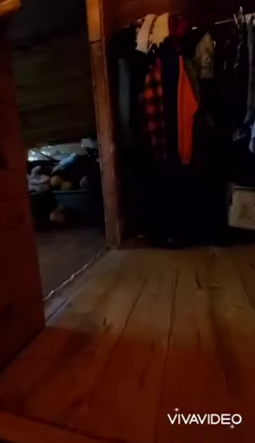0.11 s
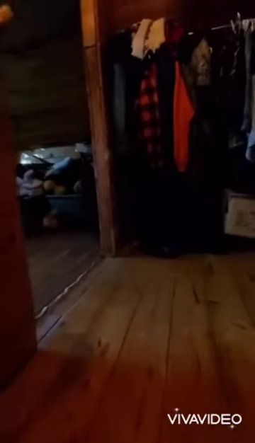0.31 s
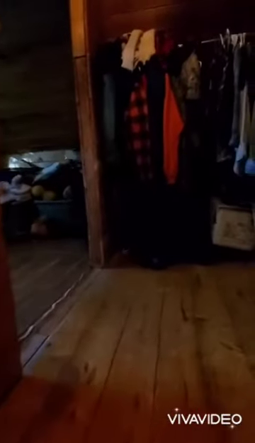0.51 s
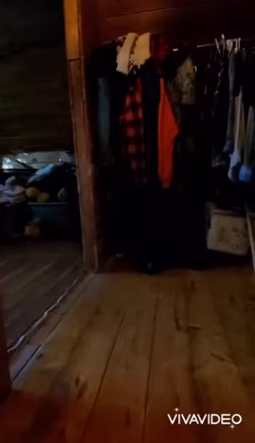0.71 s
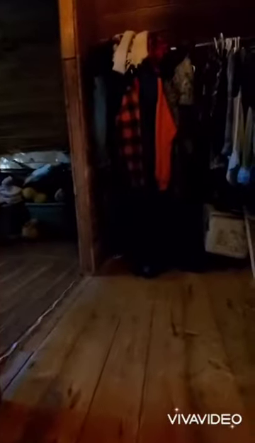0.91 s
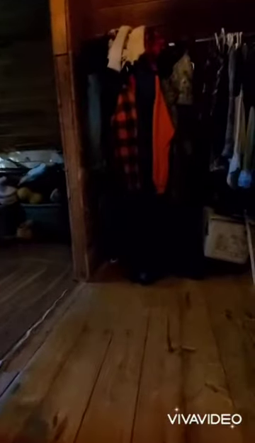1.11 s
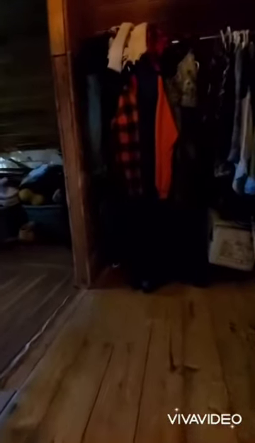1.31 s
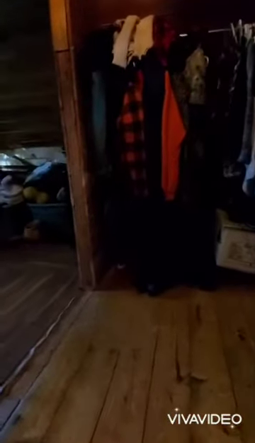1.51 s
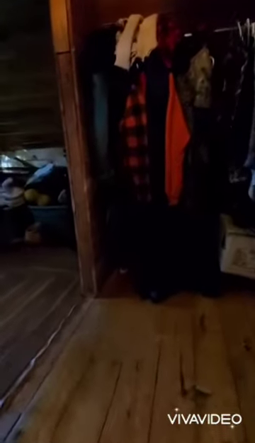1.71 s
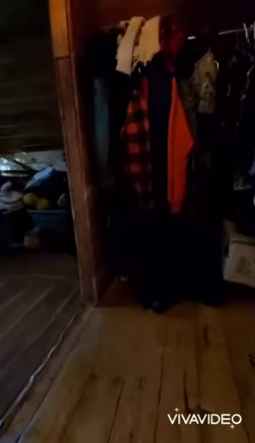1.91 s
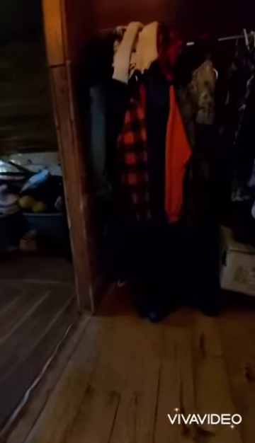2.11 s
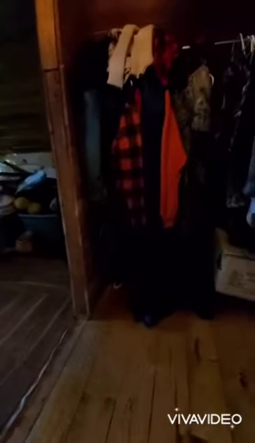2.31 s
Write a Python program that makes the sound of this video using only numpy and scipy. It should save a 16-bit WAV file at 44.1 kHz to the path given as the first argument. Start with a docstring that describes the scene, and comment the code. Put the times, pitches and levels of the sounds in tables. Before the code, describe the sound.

Footsteps on wooden planks: a knock at 0.2 s with a lighter one at 0.3, a scraping scuff into a knock at 0.5, then firm thuds at 0.7 and 0.9. A soft step at 1.1 leads into a longer scuff, ending in a knock at 1.4. Two quick knocks come near 1.8-1.9, a small bright clack at 2.1, then near quiet. Short dry room, faint wavering hum and hiss.

```python
"""Shoes on wooden stairs and planks in a small timber house, heard by a phone with two microphone ports.
Each footfall is a short rattle of contacts, each scuff a dense drag of them; both ring the boards and a
short, dry room. Single planks add notes of their own, as decaying sine tones. Underneath lie a low wavering
hum made from a sine, and a faint room hiss and thin whines made from narrow bands of noise."""
import sys
import numpy as np
from scipy import signal
from scipy.fft import rfft, irfft
from scipy.io import wavfile
from scipy.ndimage import uniform_filter1d

SR = 44100
rng = np.random.default_rng(int(sys.argv[2]) if len(sys.argv) > 2 else 0)


def dump(signal):
    """Clip the signal to [-1, 1] and save it as 16-bit WAV at the path in sys.argv[1]."""
    limited = np.clip(np.atleast_2d(signal).T, -1, 1)
    pcm = np.round(limited * 32767).astype(np.int16)
    wavfile.write(sys.argv[1], SR, pcm)


def level_to_linear(level):
    """Convert decibel levels to linear amplitude factors, elementwise."""
    exponent = np.asarray(level, float) / 20
    return 10 ** exponent


N = 110250


def along(table, hz, column=1):
    """Reads a table at any frequency, on a log-frequency axis."""
    table = np.array(table, float)
    return np.interp(np.log(hz), np.log(table[:, 0]), table[:, column])


def unit(x):
    """Scales a sound to rms 1."""
    return x / np.sqrt(np.mean(x ** 2))


def band_noise(hz, width_hz, size):
    """Noise in a bell-shaped band, rms 1."""
    f = np.fft.rfftfreq(size, 1 / SR)
    bell = np.exp(-((f - hz) / width_hz) ** 2)
    return unit(irfft(rfft(rng.standard_normal(size)) * bell, size))


def walk(rate):
    """Random levels, a new one every 1 / rate seconds, smoothed twice into a slow wander."""
    k = int(SR / rate)
    held = np.repeat(rng.standard_normal(N // k + 1), k)
    return 1.52 * uniform_filter1d(uniform_filter1d(held, k), k)[:N]


def add(out, sound, s):
    """Mixes a sound in at s seconds."""
    i = int(s * SR)
    out[:, i:i + sound.shape[1]] += sound[:, :N - i]


# How wide the sound is: side over mid [f/Hz, level/dB]
STEREO_WIDTH = [(60, -44), (125, -19.5), (250, -8.5), (500, 1), (900, 6.5), (1500, 6.5), (2500, -1),
                (5000, 1), (12000, 1.5)]
# How the two ports differ: left minus right [f/Hz, level/dB]
LEFT_OVER_RIGHT = [(60, -10.5), (110, 3), (200, -4), (380, 4), (700, 0), (1290, -0.5), (2380, 3),
                   (4400, 6.5), (8120, 6.5), (15000, 7)]


def ports(mid, side, hz):
    """Left and right from the mid and side of one band, each port with its own strength at that pitch."""
    spread = level_to_linear(along(STEREO_WIDTH, hz)) * side * np.array([[1], [-1]])
    balance = level_to_linear(along(LEFT_OVER_RIGHT, hz) * np.array([[.5], [-.5]]))
    return (mid + spread) * balance


# Tone of the room floor, before its overall level is set [f/Hz, level/dB per Hz]
HISS_TONE = [(18, -32), (30, -10), (81, -3.5), (194, -9), (616, -17.5), (988, -25), (1190, -22.5),
             (1720, -25), (2060, -28), (3140, -26.5), (3490, -33.5), (6380, -35.5), (8080, -56),
             (9460, -47), (16000, -41)]
HISS_DB, HISS_FLICKER_DB = -51, 1.


def hiss():
    """Room floor: noise in narrow bands that flicker slightly, each on its own."""
    out = 0
    for hz in 32 * 2 ** np.arange(0, 9.1, 1 / 6):
        mid, side = (band_noise(hz, hz / 13, N) for _ in range(2))
        level = level_to_linear(along(HISS_TONE, hz) + HISS_FLICKER_DB * walk(2.5))
        out = out + ports(mid, side, hz) * level * np.sqrt(hz)  # wider bands hold more power
    return unit(out) * level_to_linear(HISS_DB)


# Faint narrow bands in the floor, before they swell and spread over the ports [f/Hz, level/dB]
WHINE_BANDS = [(1190, -73.5), (2120, -75.5), (3150, -74)]
WHINE_WIDTH_HZ, WHINE_SWELL_DB = 60, 1.5


def whines():
    """Faint narrow bands of noise that swell and sink, perhaps a distant appliance."""
    out = 0
    for hz, db in WHINE_BANDS:
        mid, side = (band_noise(hz, WHINE_WIDTH_HZ, N) for _ in range(2))
        out = out + level_to_linear(db + WHINE_SWELL_DB * walk(4.08)) * ports(mid, side, hz)
    return out


# Course of the hum level, before its flutter [t/s, level/dB]
HUM_LEVEL = [(0.0, -36.5), (0.02, -49.5), (0.31, -49), (0.34, -58), (0.37, -44.5), (1.19, -53.5),
             (1.31, -44), (1.51, -63), (1.67, -45), (1.73, -68), (1.78, -73), (1.87, -52), (1.94, -61),
             (2.04, -53), (2.38, -53.5), (2.42, -63), (2.46, -52), (2.5, -59)]
HUM_HZ, HUM_WAVER_HZ, HUM_FLUTTER_DB = 60.1, 3.71, 1


def hum():
    """A low sine that wavers in pitch and level, alike at both ports."""
    s, db = np.array(HUM_LEVEL).T
    phase = 2 * np.pi * np.cumsum(HUM_HZ + HUM_WAVER_HZ * walk(12)) / SR
    level = np.interp(np.arange(N) / SR, s, db) + HUM_FLUTTER_DB * walk(24.64)
    return np.sqrt(2) * np.sin(phase) * level_to_linear(level)


# Centres of the four registers: knock, thump, clack, grit [f/Hz]
REGISTER_CENTRES = [600, 150, 2200, 5000]


def shares(hz):
    """How much of a frequency belongs to each register; neighbours fade into each other."""
    order = np.argsort(REGISTER_CENTRES)
    centres = np.log(np.sort(REGISTER_CENTRES))
    return [np.interp(np.log(hz), centres, order == k) for k in range(4)]


# Tone of struck wood, relative [f/Hz, level/dB per Hz]
WOOD_TONE = [(24, -37), (40, -17), (151, 3.5), (256, -5.5), (491, -0.5), (896, -8), (1300, -7), (1900, -9),
             (2840, -9.5), (3300, -19), (5310, -22), (8130, -36.5), (9690, -32), (14500, -48.5),
             (16000, -39.5)]
# Notes of the boards, relative; the t60 is capped below [f/Hz, level/dB, t60/s]
BOARD_MODES = [(135, -12, 0.72), (205.66, -11, 2.3), (361.4, -7.5, 0.18), (484, -2, 0.087),
               (660, -11, 0.27), (990, -18, 0.42), (1149, -10.5, 0.061), (1235, -28, 0.31)]
BOARDS_DB, BOARDS_T60_MAX_S = -12, 0.22  # level against the diffuse part
# Dying away and building up in the room [f/Hz, t60/s, build-up/s]
ROOM_DECAY = [(60, 0.33, 0.0092), (160, 0.3, 0.0044), (390, 0.16, 0.0047), (1060, .19, 0.0011),
              (2860, .17, 0.0005), (7660, 0.16, 0.00033)]


def responses(size=2 ** 14):
    """What one contact sets ringing, per register: diffuse wood and room, plus the board modes."""
    t, diffuse, modes = np.arange(size) / SR, 0, 0
    for hz in 32 * 2 ** np.arange(0, 9.1, 1 / 3):
        t60 = along(ROOM_DECAY, hz)
        rise = abs(along(ROOM_DECAY, hz, column=2)) + 1e-4
        shape = unit((1 - np.exp(-t / rise)) * 1000. ** (-t / t60))
        mid, side = (band_noise(hz, hz / 7, size) * shape for _ in range(2))
        tail = ports(mid, side, hz) * level_to_linear(along(WOOD_TONE, hz)) * np.sqrt(hz)
        diffuse = diffuse + np.multiply.outer(shares(hz), tail)
    for hz, db, t60 in BOARD_MODES:
        a, b = rng.uniform(0, 2 * np.pi, 2)
        shape = (1 - np.exp(-t / 0.016)) * 1000. ** (-t / min(t60, BOARDS_T60_MAX_S))
        tone = ports(np.sin(2 * np.pi * hz * t + a), np.sin(2 * np.pi * hz * t + b), hz) * shape
        modes = modes + level_to_linear(db) * np.multiply.outer(shares(hz), tone)
    both = diffuse / diffuse[:2].std() + level_to_linear(BOARDS_DB) * modes / modes[:2].std()
    energy = (both.mean(axis=1) ** 2).sum(axis=1)
    return both / np.sqrt(energy)[:, None, None]


def ring(force):
    """Contacts ring their own spot of the floor: registers x channels x samples."""
    return signal.fftconvolve(force[:, None, :], responses(), axes=2)


CONTACT_SCATTER_DB = 3.5  # how unequal the contacts are


def clicks(per_s, size):
    """Sparse contacts of either sign and scattered size; the first one lands at once."""
    hit, big, sign = rng.random((3, size))
    hit[0] = 0
    strength = level_to_linear(-CONTACT_SCATTER_DB * np.log(big + 0.016))
    return (hit < per_s / SR) * strength * np.sign(sign - .5)


# Soles dragging over the wood, one list per scuff, before the register gains
# [t/s, knock level/dB, thump level/dB, clack level/dB, grit level/dB]
SCUFF_PATHS = [
    [(0.34, -35, -50, -52, -67), (0.356, -34.5, -66, -48, -61), (0.384, -29, -49, -33.5, -50),
     (0.4, -33, -42, -44, -55.5), (0.44, -27.5, -34, -35.5, -50.5), (0.452, -27, -35, -44, -47),
     (0.46, -33, -32, -39, -46), (0.488, -58, -26, -52, -65), (0.495, -34, -22, -28, -47)],
    [(1.13, -41.5, -45, -47, -62), (1.154, -35.5, -43, -58, -56), (1.184, -43, -48, -48, -69),
     (1.19, -49, -50, -52, -63)],
    [(1.19, -38, -58, -52, -59), (1.204, -31, -43, -36.5, -45.5), (1.252, -29.5, -33.5, -35, -40),
     (1.302, -27, -34, -34.5, -40.5), (1.334, -29, -30.5, -33, -44.5), (1.372, -27.5, -39, -36, -44),
     (1.395, -57, -54, -75, -57)],
    [(2.065, -67, -47, -79, -82), (2.075, -42, -48, -69, -72), (2.089, -42, -42, -50, -61),
     (2.097, -35.5, -55, -31, -41), (2.109, -42, -43, -31, -47), (2.121, -45.5, -48, -51, -44),
     (2.16, -51, -42.5, -45, -70)],
]
# Added to knock, thump, clack, grit [level/dB]
SCUFF_GAINS = [-1, -1, -1, -1]
DRAG_PER_S, DRAG_PATCHY_DB = 1500, 1.2


def scuffs():
    """Dragged soles: stick-slip contacts whose pressure comes in patches."""
    out = np.zeros((2, N))
    for rows in map(np.array, SCUFF_PATHS):
        grit = clicks(DRAG_PER_S, SR // 2) * level_to_linear(DRAG_PATCHY_DB * walk(60.8)[:SR // 2])
        # even out the strength over 32 ms, so that the table leads the level
        power = np.maximum(uniform_filter1d(grit ** 2, int(0.032 * SR)), 0)
        grit = grit / np.sqrt(power + 0.0019)
        t = rows[0, 0] + np.arange(SR // 2) / SR
        db = [np.interp(t, rows[:, 0], rows[:, k + 1]) + SCUFF_GAINS[k] for k in range(4)]
        force = level_to_linear(np.array(db)) * grit * (t < rows[-1, 0])
        add(out, ring(force).sum(axis=0), max(rows[0, 0], 0))
    return out


CONTACTS_PER_S = 2500  # within a footfall or a plank note

# The plank under a foot sings its own note [t/s, f/Hz, energy level/dB, contact length/s, t60/s]
PLANK_NOTES = [(.222, 477, -44.5, 0.024, 0.058), (0.23, 206.5, -47, .01, 0.16),
               (.308, 196, -50, 0.0072, 0.05), (0.347, 756, -50.5, 0.028, 0.15),
               (0.416, 316.2, -44.5, 0.021, 0.41), (.5, 199.7, -44.5, 0.018, 0.24),
               (.695, 336, -44.5, 0.013, 0.13), (0.699, 129, -49.5, 0.016, 0.24),
               (.905, 477.6, -44, .015, 0.18), (.905, 135, -51, .01, 0.26), (1.119, 804, -55, 0.028, .12),
               (1.298, 344, -49.5, 0.08, 0.2), (1.41, 138, -51.5, 0.0069, 0.13),
               (1.643, 159, -53, 0.0022, 0.074), (1.679, 705, -76.5, 0.0059, 0.081),
               (1.787, 340, -47, 0.009, 0.067), (1.79, 168, -54, 0.0068, 0.2),
               (1.885, 173, -50, 0.0087, 0.16), (2.111, 2130, -49, .012, 0.057),
               (2.1, 1520, -51, .008, 0.055), (2.12, 3270, -57, .006, 0.042),
               (0.019, 246.6, -65.5, 0.026, 0.14), (2.177, 360, -60, 0.0024, 0.033),
               (2.177, 193.4, -58, 0.0035, 0.12)]
NOTE_RISE_CYCLES = 1.7


def notes():
    """Contacts ring one plank mode, slightly different at each port."""
    out, t = np.zeros((2, N)), np.arange(SR // 3) / SR
    for s, hz, db, length, t60 in PLANK_NOTES:
        force = np.exp(-(t / max(length, .001)) ** 2) * np.abs(clicks(CONTACTS_PER_S, t.size))
        shape = (1 - np.exp(-t * hz / NOTE_RISE_CYCLES)) * 1000. ** (-t / t60)
        mid = np.sin(2 * np.pi * hz * t)
        side = np.sin(2 * np.pi * (hz * t + rng.random()))
        tone = signal.fftconvolve(ports(mid, side, hz) * shape, force[None], axes=1)
        energy = (tone.mean(axis=0) ** 2).sum() / SR
        add(out, level_to_linear(db) * tone / np.sqrt(energy), s)
    return out


# Footfalls, energy before the register gains
# [t/s, knock level/dB, thump level/dB, clack level/dB, grit level/dB, contact length/s]
FOOTFALLS = [(0.208, -20, -36, -26.5, -38.5, 0.012), (0.3, -25.5, -36, -35.5, -52, 0.017),
             (0.495, -16.5, -36, -33.5, -42.5, 0.0063), (0.682, -17.5, -30, -26, -39, 0.0092),
             (0.896, -14.5, -28.5, -26.5, -37, 0.02), (1.111, -25.5, -45, -44.5, -52.5, 0.026),
             (1.4, -18, -46.5, -29, -43, 0.0083), (1.641, -82, -40.5, -58, -75, 0.017),
             (1.786, -16.5, -44.5, -28, -41, 0.0073), (1.879, -17.5, -44, -36, -42, 0.01),
             (2.005, -43.5, -52, -57, -60.5, 0.0098), (2.101, -40, -59, -26, -41.5, 0.019),
             (2.176, -35.5, -39, -47, -61, 0.013), (2.374, -80, -92, -60, -65.5, 0.011)]
# Added to knock, thump, clack, grit [level/dB]
FOOTFALL_GAINS = [-24.5, -16, -21, -18.5]
LANDING_S = 0.0017  # the weight builds over this time


def footfalls():
    """A sole lands within moments, then rattles and dies away over the contact length."""
    out, t = np.zeros((2, N)), np.arange(SR // 10) / SR
    for s, *db, length in FOOTFALLS:
        weight = (1.1 - np.exp(-t / LANDING_S)) * np.exp(-(t / max(length, .002)) ** 2)
        force = weight * clicks(CONTACTS_PER_S, t.size)
        parts = ring(np.tile(force, (4, 1)))
        # divide by each register's own strength, so that table and gains set its energy
        strength = np.sqrt((parts.mean(axis=1) ** 2).sum(axis=1) / SR)
        add(out, np.tensordot(level_to_linear(np.add(db, FOOTFALL_GAINS)) / strength, parts, 1), s)
    return out


def scene():
    """Background, scuffs, plank notes and footfalls together."""
    return hiss() + whines() + hum() + scuffs() + notes() + footfalls()


def roll_off(x):
    """The treble ends steeply here."""
    return signal.sosfilt(signal.butter(12, 16460, fs=SR, output="sos"), x)


NOTCH_HZ, NOTCH_Q, TOP_HZ = 7870, 18, 15350


def record(dry):
    """A narrow gap sounds near 8 kHz; the phone ends the treble with a steep top cut."""
    peak = signal.lfilter(*signal.iirpeak(NOTCH_HZ, NOTCH_Q, SR), dry)
    top_cut = signal.ellip(8, .2, 60, TOP_HZ, fs=SR, output="sos")
    mix = signal.sosfilt(top_cut, dry - peak)
    return roll_off(mix)


dry = scene()
out = record(dry)
dump(out)
```